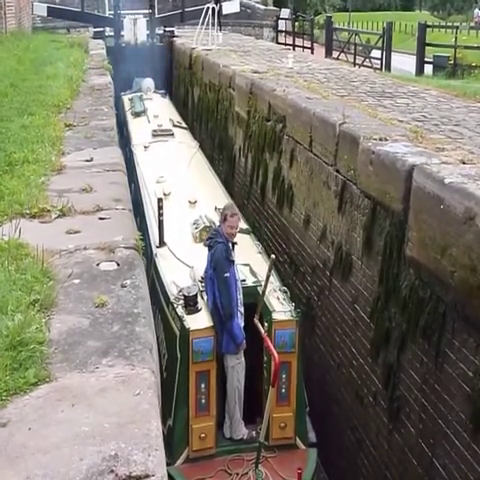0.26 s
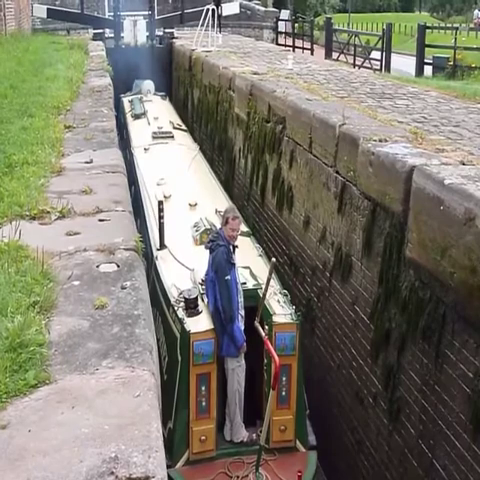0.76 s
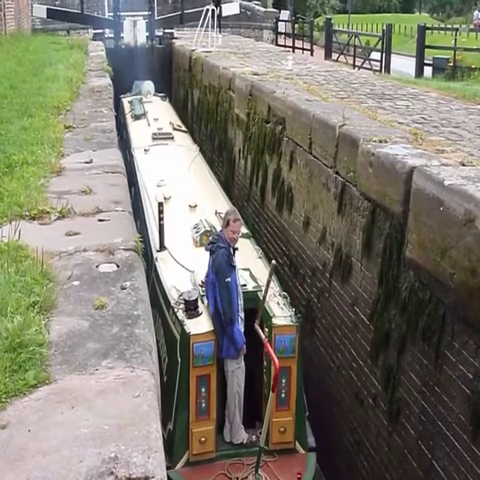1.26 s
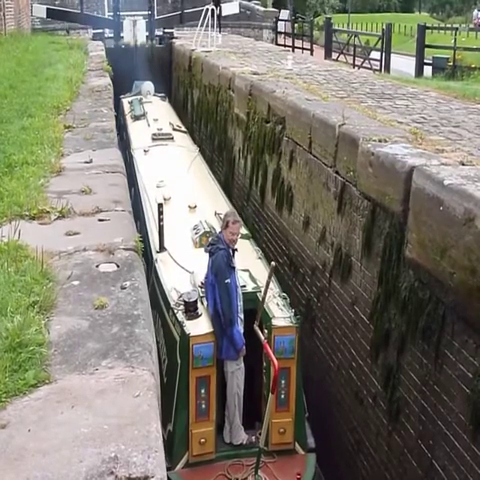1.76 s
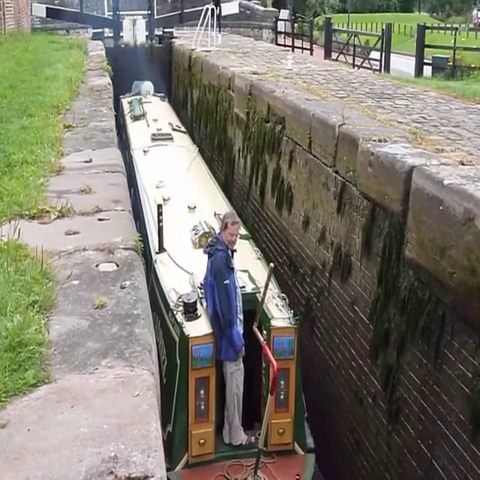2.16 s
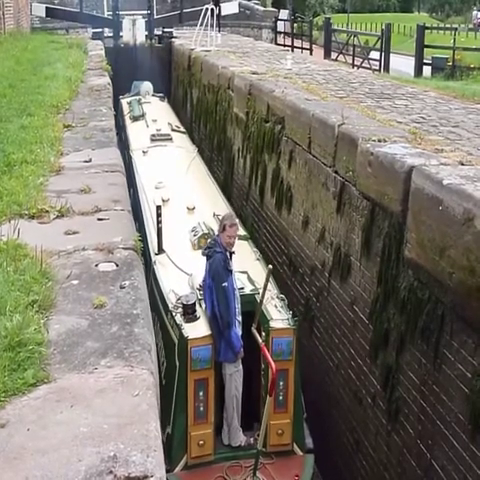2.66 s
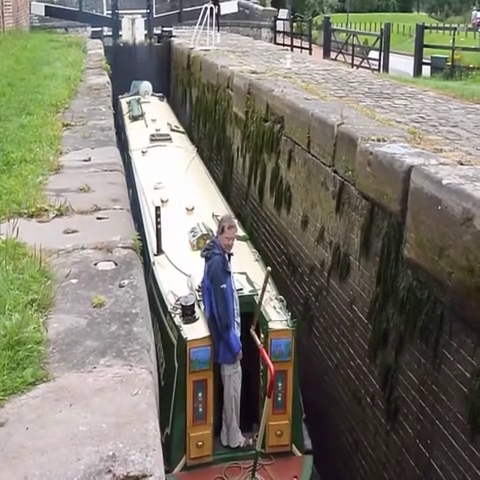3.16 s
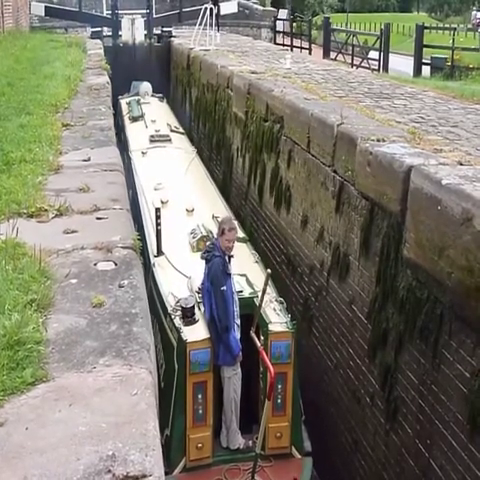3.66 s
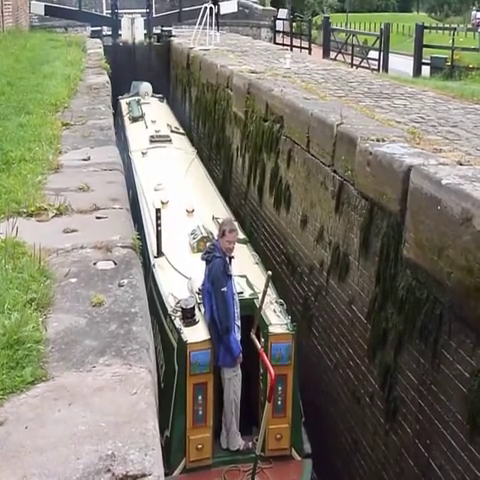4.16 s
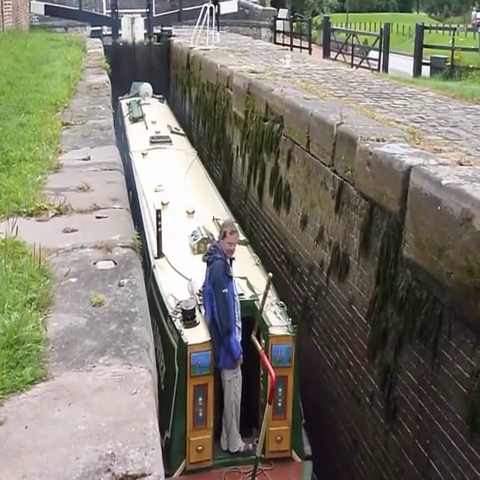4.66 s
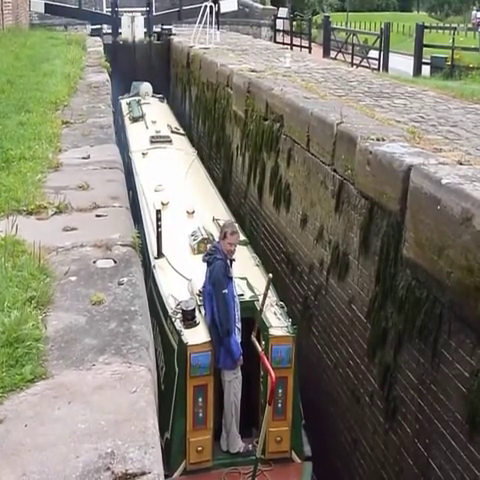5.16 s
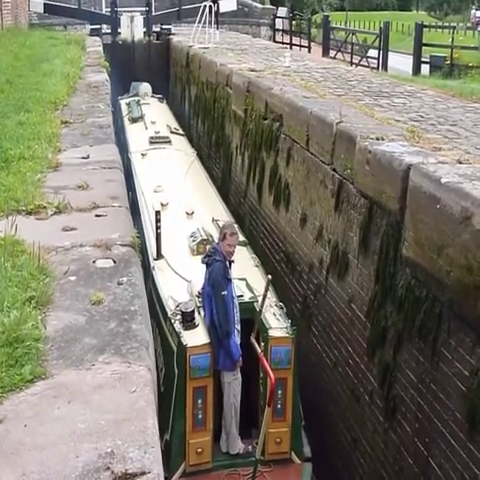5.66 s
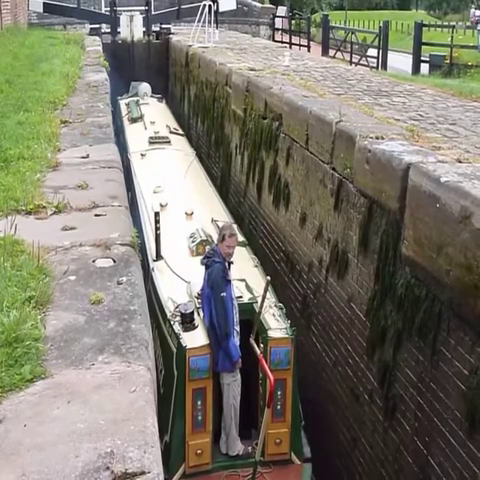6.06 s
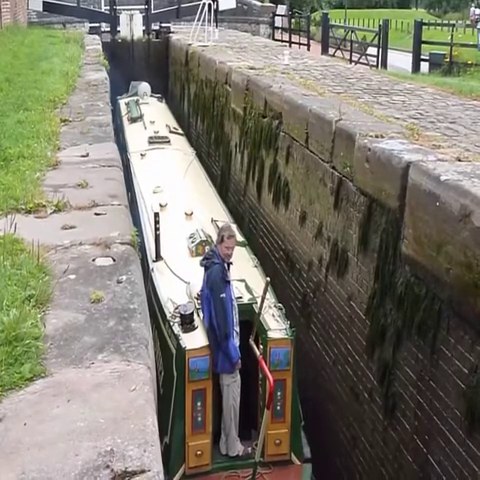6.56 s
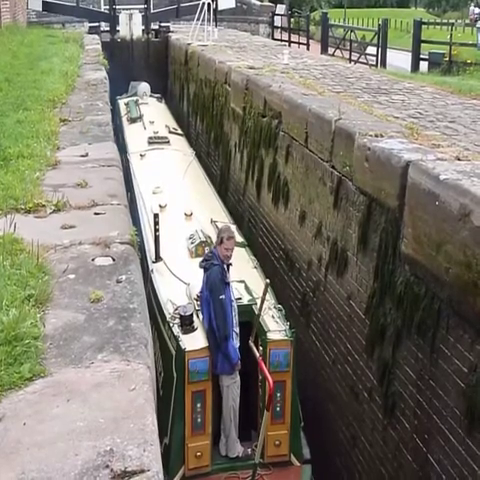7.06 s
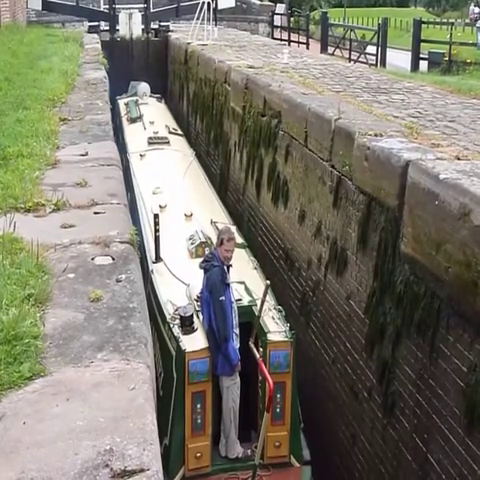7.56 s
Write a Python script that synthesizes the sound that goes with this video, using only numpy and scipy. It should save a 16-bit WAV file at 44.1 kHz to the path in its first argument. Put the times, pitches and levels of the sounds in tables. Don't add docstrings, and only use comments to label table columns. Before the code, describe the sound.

A continuous, gently heaving water roar fills a stone lock chamber from start to end, with spatter and tiny bubbles in it. A diesel in the boat chugs evenly underneath, its low pulses ringing pipe and hull. Dry ticks come in irregular clusters, strongest near the middle, with quick wall echoes. Brief splashes and a few deep glugs pass. Outdoor handheld stereo, close to the lock, with little deep bass or air on top.

```python
import sys
import numpy as np
from scipy import signal
from scipy.fft import rfft, irfft
from scipy.io import wavfile
from scipy.ndimage import uniform_filter1d

SR = 44100
rng = np.random.default_rng(int(sys.argv[2]) if len(sys.argv) > 2 else 0)


def file_out(sig):
    cols = np.atleast_2d(sig).T
    lim = np.clip(cols, -1, 1)
    pcm = np.round(lim * 32767).astype(np.int16)
    wavfile.write(sys.argv[1], SR, pcm)


def boost_factor(decibels):
    exponent = np.asarray(decibels, float) / 20
    return 10 ** exponent


N = 343539
ENGINE_HZ = 3.152


def evened(x):
    return x / np.sqrt(np.mean(x ** 2) + 1e-20)


def read(points, hz):
    point_hz, value = np.transpose(points)
    return np.interp(np.log(hz + 1), np.log(point_hz + 1), value)


def add(mix, start_s, sound):
    part = mix[round(start_s * SR):][:len(sound)]
    part += sound[:len(part)]


def colour(x, gain):
    return irfft(rfft(x) * gain(np.fft.rfftfreq(N, 1 / SR)), N)


def wander(t, top_hz=9):
    hz = np.geomspace(2, top_hz, num=24)[:, None]
    return evened(np.sin(2 * np.pi * (hz * t + rng.random(hz.shape))).sum(axis=0))


# time in seconds, lead in cycles.
CRANK_LEAD = [(0, .011), (1.6, .021), (2.9, .0165), (3.9, .0215), (5.2, .0205), (6.8, .0285), (7.8, .026)]


def crank_cycles(t):
    return ENGINE_HZ * t + np.interp(t, *np.transpose(CRANK_LEAD))


# frequency in Hz, level in dB per Hz.
WATER_SPECTRUM = [(30, -15), (50, -6.5), (80, -16), (130, -2.5), (200, 0), (320, -3), (450, -3),
                  (800, -5.5), (1300, -6.5), (1900, -9), (2300, -11.5), (3800, -12.5), (5200, -11.5),
                  (7400, -17)]


def water_gain(hz):
    return boost_factor(read(WATER_SPECTRUM, hz))


# time in seconds, level in dB.
GATE_SURGE = [(0.0, -30.5), (0.87, -29), (1.08, -30), (2.3, -29), (2.56, -29), (3.25, -30), (3.75, -29.5),
              (4.06, -30.5), (4.6, -29), (5.71, -29.5), (6.68, -29), (6.94, -30), (7.42, -29),
              (7.79, -29.5)]


def flow_db(t, hz):
    surge_db = np.interp(t, *np.transpose(GATE_SURGE))
    surge_db = surge_db - surge_db.mean()
    crank = crank_cycles(t)
    knock_width = 0.055
    knock = sum(np.exp(-(((crank - place + .5) % 1 - .5) / knock_width) ** 2) for place in (.0, .68))
    roar_db = 0.79 * surge_db + 0.32 * wander(t) + 0.7 * knock
    churn_db = 0.3 * surge_db + 0.5 * wander(t)
    fizz_db = 1.1 * surge_db + 0.8 * wander(t)
    high = np.clip(np.log2(hz / 2400 + 1e-9) / 1.4, 0, 1)[:, None]
    low = np.clip(np.log2(800 / (hz + 1)) / .5, 0, 1)[:, None]
    heaves = (hz > 220)[:, None]
    return heaves * ((1 - high - low) * roar_db + high * fizz_db + low * churn_db)


def rush(patchy_db=1.23, flicker_db=0.86):
    frames, hz = N // 128 + 6, np.fft.rfftfreq(512, 1 / SR)
    a, b, c, d, patches, flicker = rng.standard_normal((frames, 257, 6)).T
    patches = evened(uniform_filter1d(uniform_filter1d(patches, 6, axis=0), 18, axis=1))
    flicker = evened(uniform_filter1d(uniform_filter1d(flicker, 40, axis=0), 5, axis=1))
    flow = flow_db(np.arange(frames) * 128 / SR, hz)
    field = boost_factor(flow + patchy_db * patches + flicker_db * flicker)
    spectra = np.array([a + 1j * b, c + 1j * d]) * field
    pair = signal.istft(spectra, nperseg=512, noverlap=384)[1][:, :N]
    return evened(colour(pair, water_gain))


def chance_hits(per_s, spread_db, most):
    when, size = rng.random((2, 2, int(per_s * N / SR)))
    strength = boost_factor(spread_db * np.minimum(-np.log(size + 1e-9), most))
    train = np.zeros((2, N))
    np.put_along_axis(train, (when * N).astype(int), strength, 1)
    return train


def droplets(per_s=900, spread_db=4.0, cycles=6.8):
    out = np.zeros((2, N))
    for hz in np.geomspace(350, 7000, num=16):
        u = np.arange(int(3 * cycles / hz * SR)) / SR * hz / cycles
        tone = np.sin(2 * np.pi * cycles * u * (1 + 0.064 * u))
        blip = tone * (1 - np.exp(-8 * u)) * np.exp(-2.2 * u)
        train = chance_hits(per_s / 16, spread_db, 4)
        blips = signal.oaconvolve(train, blip[None], axes=1)[:, :N]
        out += blips * np.sqrt(hz / 1000) * water_gain(hz)
    return evened(out)


def spatter(per_s=110, spread_db=3.5, decay_s=.0018):
    train = chance_hits(per_s, spread_db, 3)
    decay = np.exp(-np.arange(300) / SR / decay_s)
    swell = signal.oaconvolve(train, decay[None], axes=1)[:, :N]
    slaps = swell * rng.standard_normal((2, N))
    return evened(colour(slaps, lambda f: (f / 3000) ** 2 / (1 + (f / 3000) ** 4)))


# frequency in Hz, likeness of the two ports 0-1.
PORT_LIKENESS = [(60, 1.0), (270, 0.97), (850, 1.0), (1810, 0.98), (2640, 0.93), (3850, 0.35), (5620, 0.6),
                 (8200, 0.73)]
# frequency in Hz, left minus right in dB.
PORT_LEAN = [ (60, -0.5), (850, -0.5), (1240, -1.0), (1810, -3), (2640, -4.5), (3850, -6.5), (5620, -4.5),
             (8200, 0)]
# frequency in Hz, lead of the left port in radians.
PORT_TURN = [ (0, 0.17), (3010, -0.27), (5170, -1.05), (5600, -0.97), (6720, -0.46), (7320, -0.8),
             (8010, -1.9), (8350, -0.42)]


def ports(shared, other):
    hz = np.fft.rfftfreq(N, 1 / SR)
    same = np.clip(read(PORT_LIKENESS, hz), 0, .9985)
    right = rfft(shared)
    left = same * right + np.sqrt(1 - same ** 2) * rfft(other)
    left = left * np.exp(1j * read(PORT_TURN, hz))
    lean = boost_factor(read(PORT_LEAN, hz) / 2)
    return irfft(np.array([left * lean, right / lean]), N)


# place in cycle 0-1, resonance in Hz, first cylinder in dB,
# second cylinder in dB.
ENGINE_STROKES = [(.04, 56.6, -32, -36), (.11, 85.7, -42.5, -37), (.13, 187.3, -22, -27.5),
                  (.16, 93.5, -29.5, -34.5), (.25, 80.4, -31.5, -25.5), (0.293, 118.6, -28, -23.5),
                  (0.299, 194, -28.5, -31), (0.284, 255.7, -40.5, -26.5), (0.389, 73.8, -37.5, -31),
                  (.42, 184, -39.5, -34.5), (.47, 175.4, -32.5, -33), (.49, 93.4, -24.5, -23.5),
                  (.0, 128.5, -35.5, -30), (.29, 151.4, -46.5, -30.5), (.46, 207.6, -39.5, -34),
                  (.1, 40.4, -41.5, -40.5)]


def engine(wobble_db=0.57, low_turns=1.63, uneven_cycles=0.0033):
    t = np.arange(N) / SR
    cycles, times = np.r_[-3, crank_cycles(t)], np.r_[-3 / ENGINE_HZ, t]
    out = np.zeros(N + SR)
    for place, hz, *cylinder_db in ENGINE_STROKES:
        ring_turns = low_turns * (hz / 95) ** 0.34
        u = t[:SR // 4] * hz / ring_turns
        thump = u * np.exp(1 - u) * np.sin(2 * np.pi * ring_turns * u)
        for half in range(-2, 50):
            cylinder = half % 2
            start_s = np.interp(place + half / 2 + uneven_cycles * cylinder, cycles, times, right=9)
            level_db = cylinder_db[cylinder] + wobble_db * rng.standard_normal()
            add(out, start_s + 1, boost_factor(level_db) * thump)
    return out[SR:]


def burst(t, burst_s, ring_db=-11, ring_s=0.0029):
    rise = np.clip(t / 0.00024, 0, 1)
    rattle = np.clip((burst_s - t) / 0.00032, 0, 1)
    return rise * (rattle + (1 - rattle) * boost_factor(ring_db) * np.exp(-(t - burst_s) / ring_s))


# start in seconds, peak in dB, leading low mode in Hz.
FITTING_TICKS = [(0.0085, -18.5, 1950), (0.0398, -14, 1990), (0.2108, -19, 1730), (0.6938, -16, 1980),
                 (0.718, -11, 1860), (0.7633, -7.5, 1980), (1.004, -14, 1680), (1.2493, -20, 2050),
                 (2.3575, -19, 1860), (2.893, -15, 2010), (3.1817, -16, 1940), (3.2244, -9.5, 2010),
                 (3.4597, 0, 1750), (4.1256, -5.5, 1900), (4.441, -14, 1960), (4.8576, -15, 1830),
                 (5.0868, -1, 1780), (5.1537, -22, 1800), (6.598, -17, 1870), (7.7495, -11, 1970)]
# start in seconds, peak in dB, mode in Hz.
FITTING_SNAPS = [(0.0085, -17.5, 2600), (0.0413, -16, 2880), (0.1451, -21, 3780), (0.2104, -18, 2500),
                 (0.2548, -18, 2580), (0.5908, -23, 4120), (1.251, -25, 2640), (2.357, -29, 2940),
                 (2.8928, -17, 2850), (3.0699, -19, 3300), (3.2236, -18, 3320), (3.4585, -13.5, 2700),
                 (4.1237, -15, 2840), (4.4413, -21, 3100), (4.652, -19, 2800), (4.5394, -19, 2980),
                 (4.8564, -19, 2650), (5.085, -14.5, 2840), (5.5873, -17.5, 3100), (6.5036, -18, 2650),
                 (6.5969, -16, 2770), (6.803, -13.5, 2700), (7.0055, -18, 2600), (7.014, -18, 2860),
                 (7.211, -21, 2780), (7.289, -21, 2920), (7.7498, -13.5, 2600)]


def ticks(partner_db=-10, pair_hz=3690):
    low, high, t = np.zeros(N), np.zeros(N), np.arange(900) / SR
    for start_s, db, hz in FITTING_TICKS:
        tone = np.sin(2 * np.pi * hz * t)
        tone += boost_factor(partner_db) * np.cos(2 * np.pi * (pair_hz - hz) * t)
        add(low, start_s, -boost_factor(db - 6.5) * burst(t, 0.0025) * tone)
    struck_s = np.transpose(FITTING_TICKS)[0]
    for start_s, db, hz in FITTING_SNAPS:
        near_s = struck_s[abs(struck_s - start_s).argmin()]
        if abs(near_s - start_s) < .004:
            start_s = near_s
        tone = np.sin(2 * np.pi * hz * t) + boost_factor(-6) * np.sin(2 * np.pi * 1.33 * hz * t)
        tone += boost_factor(-1.5) * rng.standard_normal(len(t)) * np.exp(-t / .0007)
        add(high, start_s, boost_factor(db - 4) * burst(t, .0024, ring_db=-14) * tone)
    wall = np.zeros(2600)
    wall[0] = 1
    echoes = (.0048, -9), (.0113, -9.5), (.0135, -16), (.017, -25.5), (.023, -18.5), (.034, -20)
    for delay_s, db in echoes:
        wall[round(delay_s * SR)] = boost_factor(db)
    pair = low * boost_factor(np.array([[-2.7], [2.3]])) + high * boost_factor(np.array([[-4.3], [2.9]]))
    return signal.oaconvolve(pair, wall[None], axes=1)[:, :N]


# start in seconds, rms in dB, centre in Hz, length in seconds.
GUSHES = [(1.319, -28.5, 497, 0.09), (2.45, -30, 400, 0.088), (2.557, -36, 400, 0.05),
          (4.548, -27.5, 500, 0.033), (5.15, -38, 550, 0.077), (5.506, -33, 500, .04), (6.3, -30, 700, .05),
          (5.891, -25, 700, 0.036), (6.071, -28, 550, 0.048), (6.202, -31, 600, 0.081),
          (7.544, -27, 400, 0.064), (.2, -24.5, 1800, 0.053), (0.583, -26, 2500, .015),
          (1.239, -26.5, 1800, 0.032), (2.706, -26.5, 3300, .04), (4.527, -35, 3000, 0.019),
          (6.141, -30.5, 1500, 0.034), (6.292, -31, 1800, 0.059)]


def splashes():
    out = np.zeros((2, N))
    for start_s, db, hz, length_s in GUSHES:
        u = np.arange(int(3 * length_s * SR)) / (length_s * SR)
        band = signal.butter(1, [hz / 1.7, hz * 1.7], "bandpass", fs=SR)
        gush = evened(signal.lfilter(*band, rng.standard_normal((2, SR // 2))))[:, :len(u)]
        swell = 3 * u * np.exp(1 - 3 * u)
        for side in range(2):
            add(out[side], start_s, boost_factor(db) * gush[side] * swell)
    return out


# middle in seconds, peak in dB, pitch in Hz, length in seconds.
HULL_GLUGS = [
    (0.496, -25.5, 245, 0.086),
    (2.311, -22, 534, 0.036),
    (4.549, -30, 533, 0.043),
    (4.934, -23.5, 259, 0.078),
    (5.01, -22, 262.6, 0.0508),
    (7.2, -26, 460, 0.032),
    (7.587, -23, 407, 0.0353),
]


def glugs():
    out = np.zeros(N)
    for middle_s, db, hz, length_s in HULL_GLUGS:
        u = np.arange(int(length_s * SR)) / (length_s * SR)
        tone = np.sin(2 * np.pi * hz * length_s * u * (.98 + 0.043 * u))
        add(out, middle_s - length_s / 2, boost_factor(db) * np.sin(np.pi * u) * tone)
    return out


def scene():
    water = boost_factor(-23.0) * rush() + boost_factor(-33.5) * droplets() + boost_factor(-39.5) * spatter() + splashes()
    return ports(*water) + engine() + ticks() + glugs()


# frequency in Hz, share of frames 0-1.
LOST_FROM_SUM = [(8200, 0), (8300, .6), (8900, .66), (9000, .86)]
# frequency in Hz, share of frames 0-1.
LOST_FROM_DIFFERENCE = [(200, .985), (350, .95), (950, .94), (1250, .55), (1500, .33), (2800, 0), (7300, 0),
                        (8050, .98)]
# frequency in Hz, share 0-1.
SMALL_GAPS = [(6600, 0), (7200, .08), (7700, .2), (7950, .45), (8050, .05)]


def band_dropouts(x):
    sum_difference = np.array([x[0] + x[1], x[0] - x[1]]) / 2
    hz, t, z = signal.stft(sum_difference, SR, nperseg=2048, noverlap=1024)
    band = (9 * np.log2(1 + hz / 700)).astype(int)
    spell = np.cumsum(rng.random(len(t)) < .6)
    short = rng.random(len(t))
    luck, pick = rng.random((len(t), 64, 2)).T[:, band]
    need = np.where(pick < .6, short, luck)[:, spell]
    lost = np.array([read(LOST_FROM_SUM, hz), read(LOST_FROM_DIFFERENCE, hz)])
    kept = need >= lost[:, :, None]
    gap_luck = rng.random((len(t), 257)).T[np.arange(len(hz)) // 4]
    kept = kept * (gap_luck >= read(SMALL_GAPS, hz)[:, None])
    mid, side = signal.istft(z * kept, SR, nperseg=2048, noverlap=1024)[1][:, :N]
    return np.array([mid + side, mid - side])


def low_pass(x):
    return signal.sosfilt(signal.butter(12, 9600, fs=SR, output="sos"), x)


def record(dry):
    def mic(f):
        bass = (f / 30) ** 2 / (1 + (f / 30) ** 2)
        return bass / np.sqrt(1 + (f / 7500) ** 40) + boost_factor(-38) * (f > 8300)
    return low_pass(band_dropouts(colour(dry, mic)))


dry = scene()
out = record(dry)
file_out(out)
```